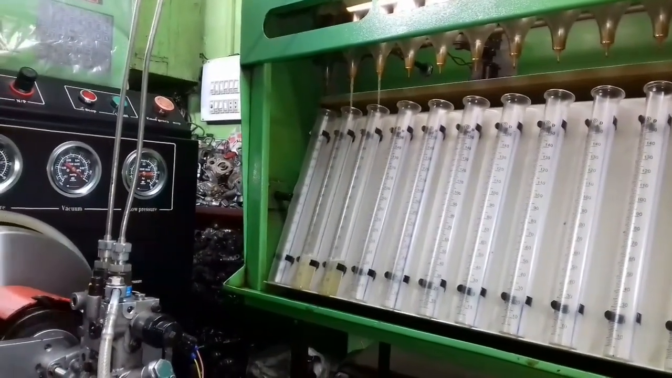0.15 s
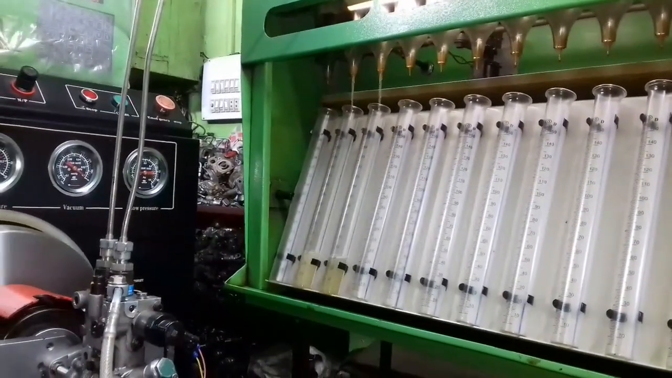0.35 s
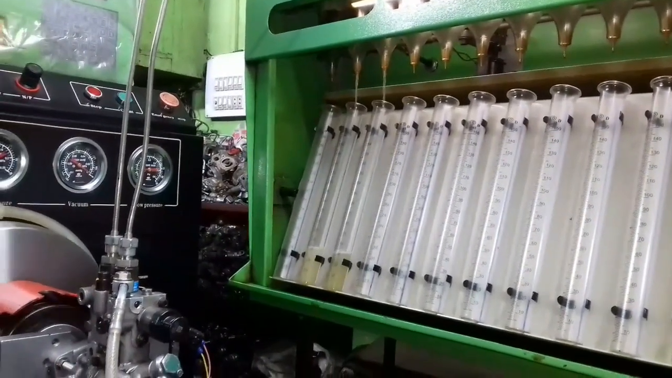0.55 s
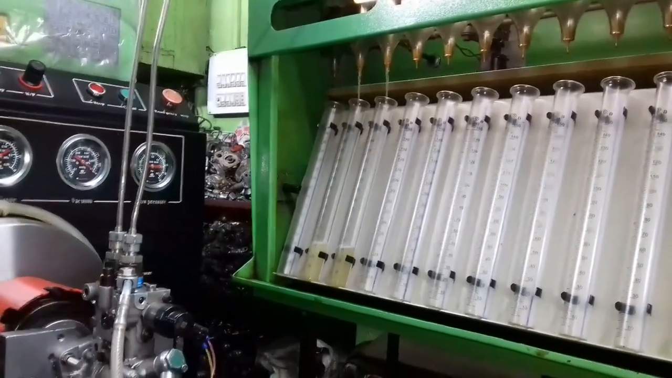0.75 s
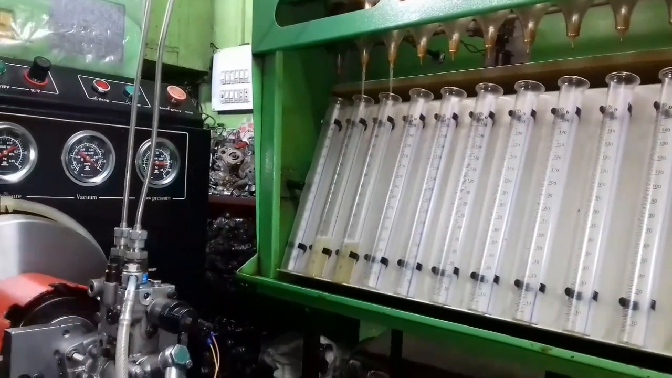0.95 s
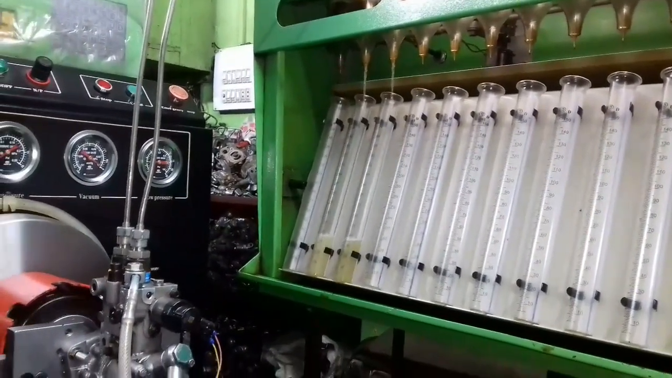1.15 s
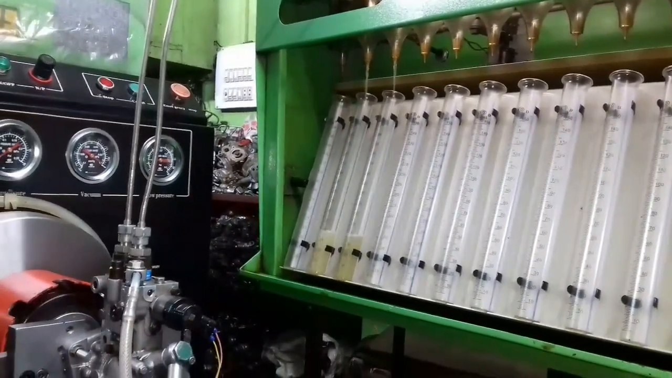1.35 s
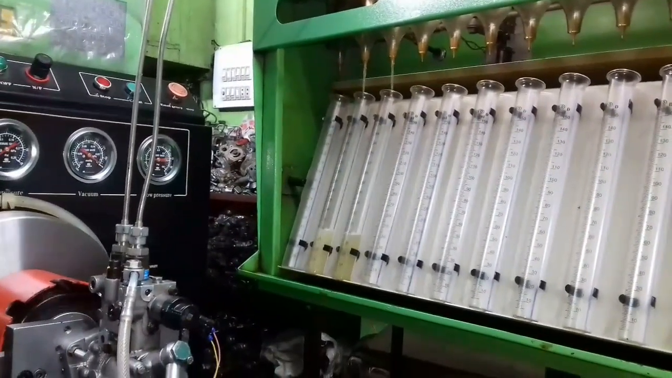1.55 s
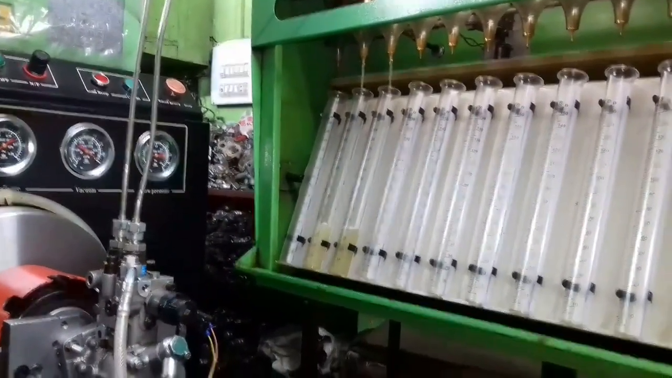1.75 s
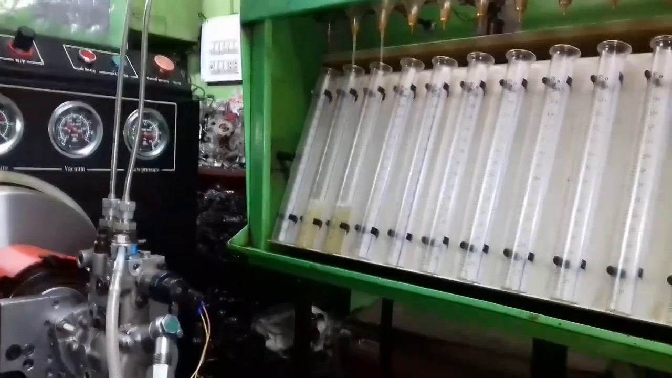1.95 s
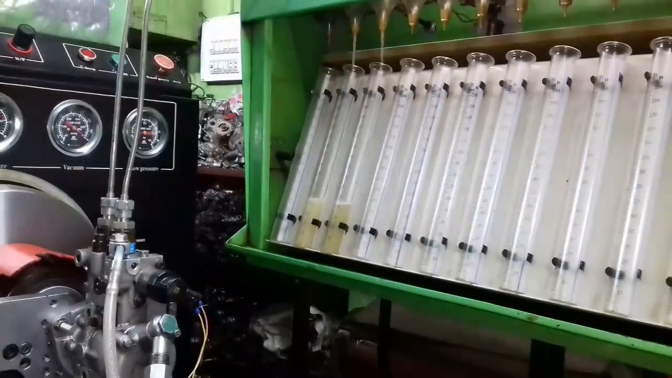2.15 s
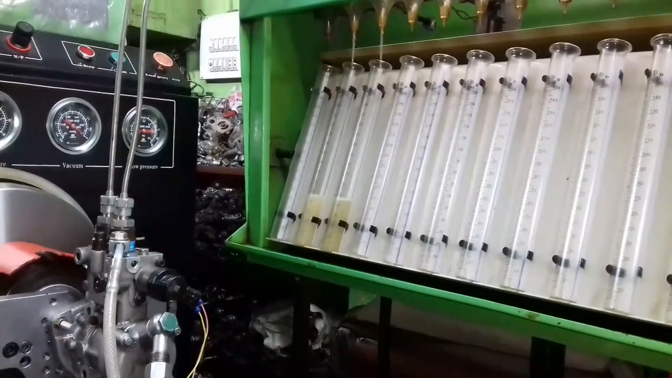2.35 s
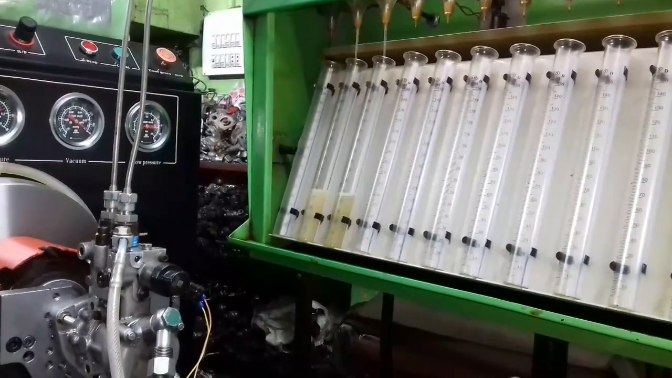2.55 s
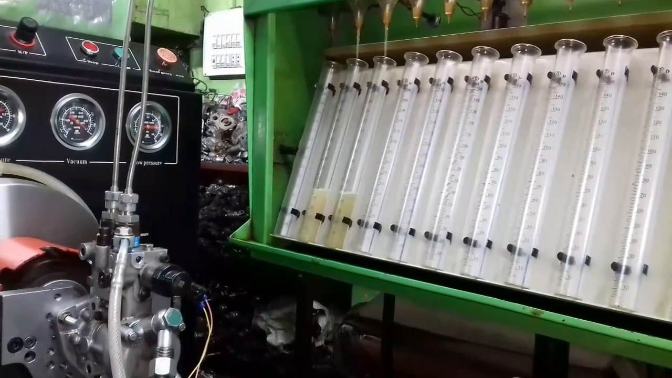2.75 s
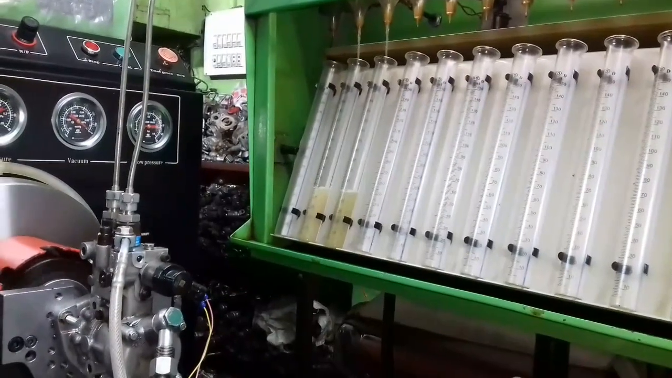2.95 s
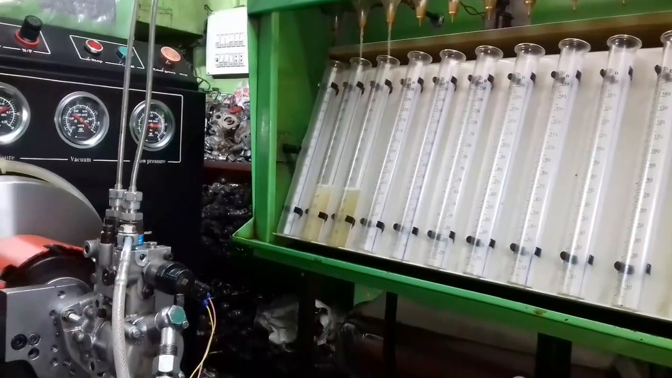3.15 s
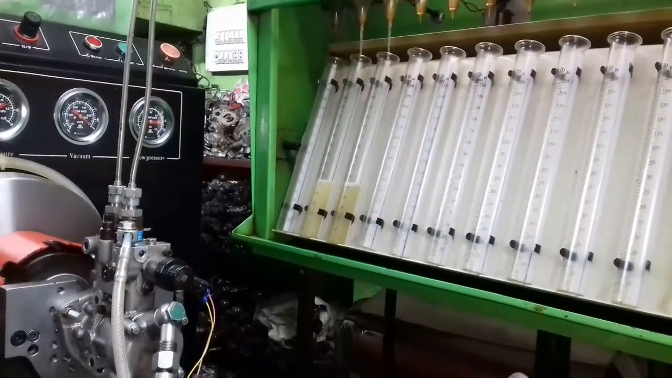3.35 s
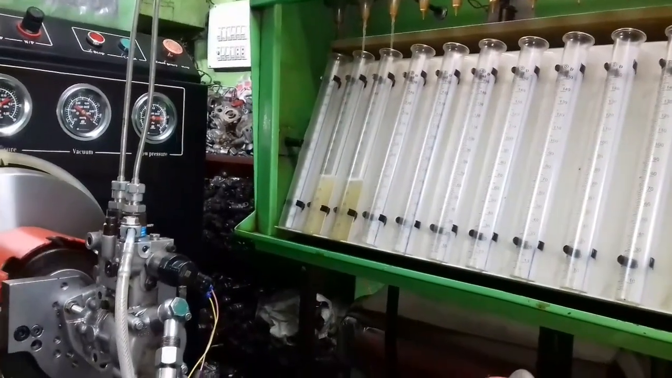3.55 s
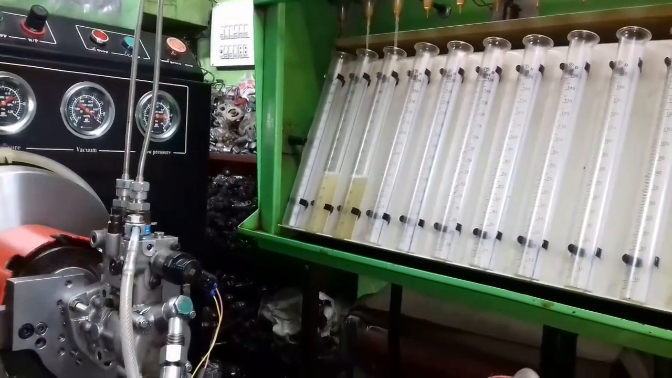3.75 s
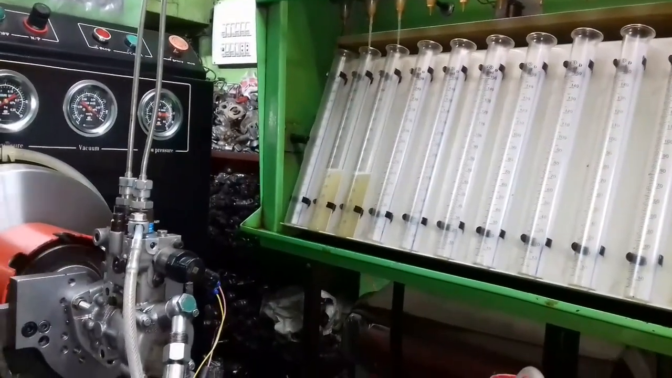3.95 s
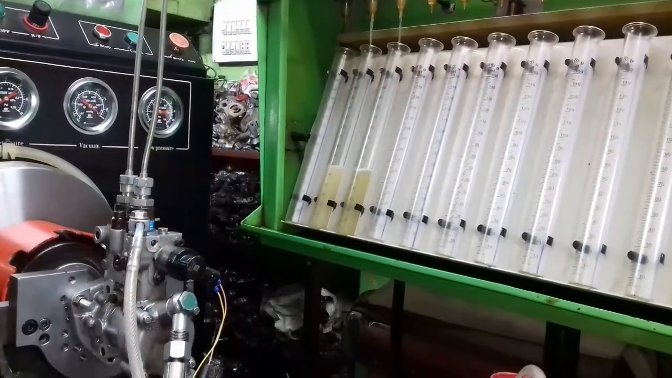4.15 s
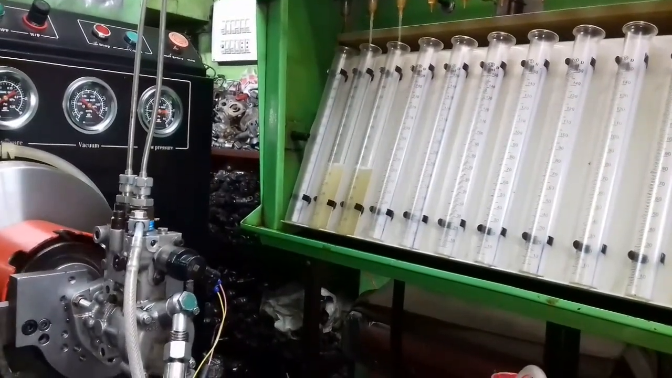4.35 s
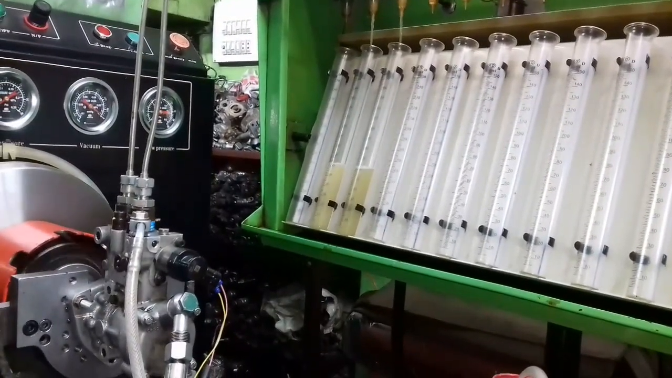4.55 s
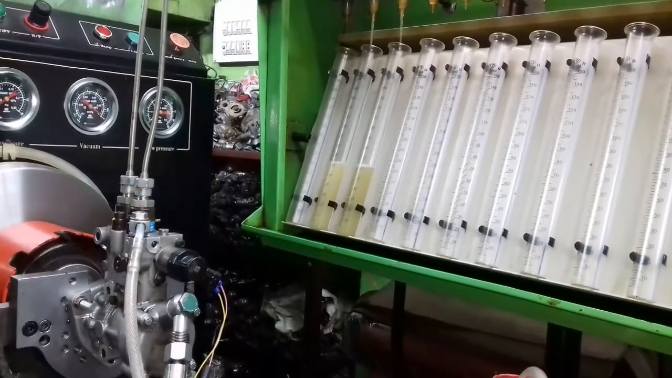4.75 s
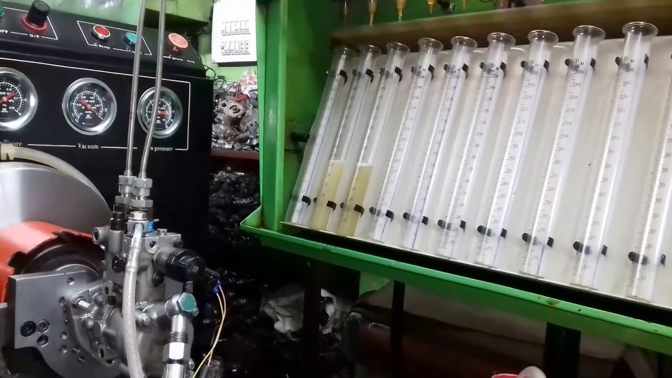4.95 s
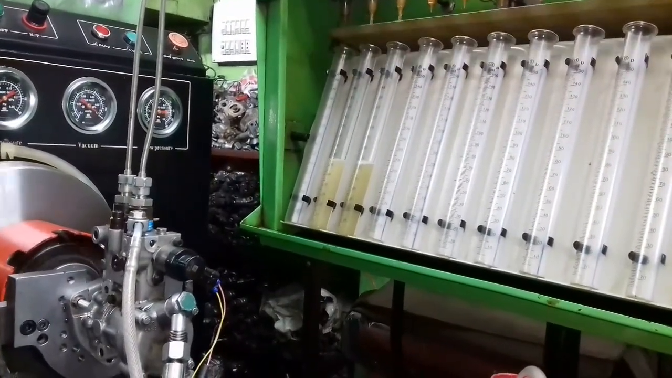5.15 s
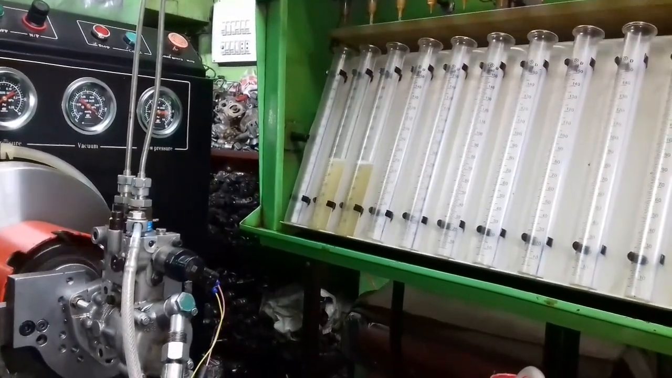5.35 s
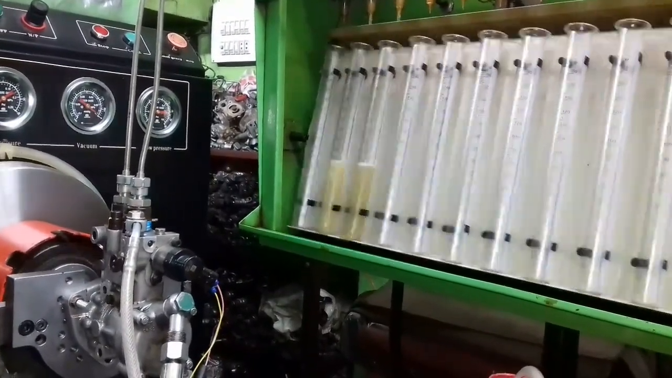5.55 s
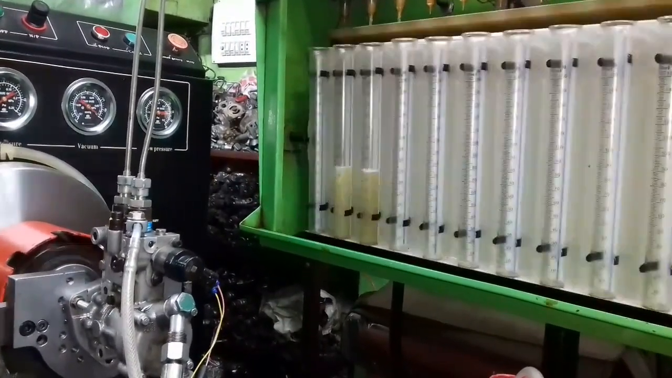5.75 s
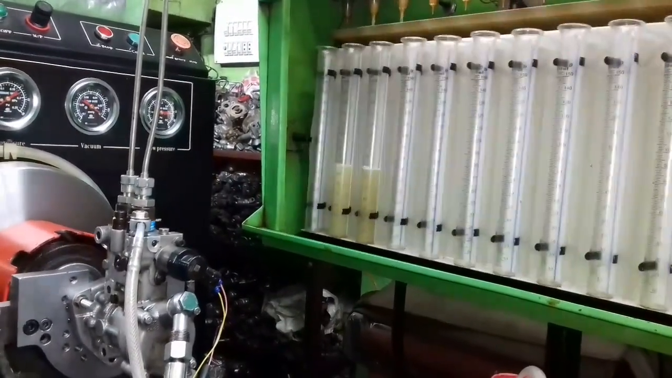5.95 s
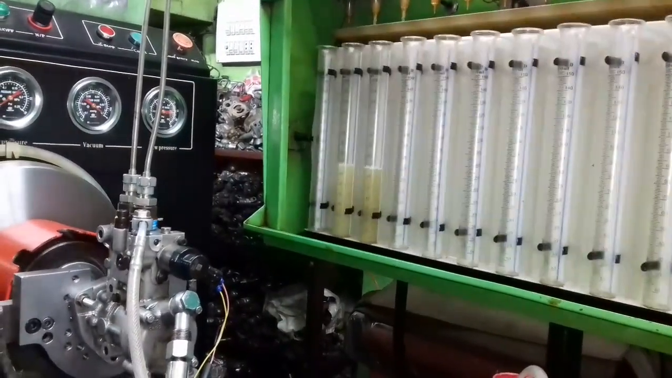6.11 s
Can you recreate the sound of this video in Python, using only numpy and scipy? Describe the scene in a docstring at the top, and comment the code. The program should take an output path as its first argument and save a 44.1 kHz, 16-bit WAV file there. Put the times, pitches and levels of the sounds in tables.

```python
"""A three-plunger fuel injection pump runs on a test bench in a small workshop.
Throughout, summed harmonics make drive, pump body and pipe throb; shaped noise makes the tappets rattle,
decaying modes make a nozzle chirp, and puffs of high hiss are fuel squirting into two measuring glasses.
At 4.7 s a closing shutter cuts off the jets and the load eases; at 4.9 s it slams in six blows of noise.
The limiter ducks and recovers very slowly; two small clicks of noise follow from the rack of glasses."""
import sys
import numpy as np
from scipy import signal
from scipy.fft import rfft, irfft
from scipy.io import wavfile
from scipy.ndimage import uniform_filter1d

SR = 44100
rng = np.random.default_rng(int(sys.argv[2]) if len(sys.argv) > 2 else 0)


def to_wav(sig):
    """Store sig (one row per channel, or 1-D mono) as 16-bit WAV at the path in sys.argv[1].

    Samples outside -1..1 are clipped; the rate is SR.
    """
    pcm = np.clip(np.atleast_2d(sig), -1, 1) * 32767
    pcm = np.round(pcm).astype(np.int16)
    wavfile.write(sys.argv[1], SR, pcm.T)  # frames by channels


N = 276948
TIME = np.arange(N) / SR

SHAFT_HZ, PLUNGERS = 10.1283, 3
STROKE_HZ = PLUNGERS * SHAFT_HZ
TURNS = SHAFT_HZ * TIME


def amp(db):
    """Decibels to gain."""
    return 10 ** (np.asarray(db) / 20)


def unit(x):
    """Scales to an rms of 1."""
    return x / np.sqrt(np.mean(x ** 2) + 1e-20)


def across(rows):
    """Interpolates rows (Hz, value) on a log axis, for every frequency bin."""
    hz, value = np.transpose(rows)
    bins_hz = np.fft.rfftfreq(N, 1 / SR)
    return np.interp(np.log(bins_hz + 1), np.log(hz), value)


def tint(x, gain):
    """Filters by one gain for each frequency bin."""
    return irfft(rfft(x) * gain, N)


def hiss(rows):
    """Noise of rms 1 with the given colour."""
    return unit(tint(rng.standard_normal(N), amp(across(rows))))


def drift(rate_hz):
    """Random wander of rms 1: straight lines between rate_hz random knots a second."""
    knots = rng.standard_normal(1024)
    return unit(np.interp(TIME * rate_hz, np.arange(len(knots)), knots))


def ring(x, hz, width_hz):
    """Resonance of rms 1 and given half-power width; a double pole makes the skirts steep."""
    pole = np.exp((-np.pi * width_hz * np.pi / 2 + 2j * np.pi * hz) / SR)
    return unit(signal.lfilter([1], np.poly([pole, pole]), x).real)


def add(mix, start_s, sound):
    """Mixes a sound in at start_s, trimmed to the ends of the mix."""
    start = round(start_s * SR)
    part = mix[max(start, 0):max(start + len(sound), 0)]
    part += sound[max(-start, 0):][:len(part)]


def blow(start_s, rise_s, t60_s):
    """Envelope of one impact: a quick linear rise under an exponential decay."""
    age_s = np.maximum(TIME - start_s, 0)
    return np.minimum(age_s / rise_s, 1) * amp(-60 * age_s / t60_s)


def eased(start_s=4.66, length_s=0.11):
    """Share of the load relieved: goes from 0 to 1 while the shutter closes."""
    return np.clip((TIME - start_s) / length_s, 0, 1)


# Diffuse reflection of the workshop. Each row: frequency in Hz, relative gain in dB.
ROOM_COLOUR = [(60, -4), (180, -12), (550, -10), (1650, -8), (4970, -21), (15000, -12)]


def workshop(x, t60_s=0.033, level_db=2, gap_s=0.004):
    """Side walls return a short diffuse tail, modelled by decaying noise after a gap."""
    t = np.arange(SR // 2) / SR
    tail = rng.standard_normal(len(t)) * amp(-60 * t / t60_s) * (t > gap_s)
    tail /= np.linalg.norm(tail)
    return signal.fftconvolve(tint(x, amp(level_db + across(ROOM_COLOUR))), tail)[:N]


# Gear case resonances. Each row: frequency in Hz, width between -6 dB points in Hz,
# rms level in dB of a stroke harmonic at the peak.
GEAR_CASE_MODES = [(255, 59, -47.5), (361.6, 10.6, -43), (475.4, 54, -40), (619, 97, -44.5),
                   (943, 164, -41.5), (1141, 30, -41), (1240, 23.6, -36.5), (1544, 190, -47),
                   (1689, 37, -39.5), (3994, 45, -46)]


def gears(turns, between_strokes_db=-17):
    """Gears buzz alike every turn: shaft harmonics coloured by the case; near-equal plungers favour every third."""
    k = np.arange(1, 440)
    power = 0
    for hz, width_hz, db in GEAR_CASE_MODES:
        detune = 2 * (k * SHAFT_HZ - hz) / width_hz
        power = power + (amp(db) / (1 + detune ** 2)) ** 2
    size = np.sqrt(power) * amp(between_strokes_db * (k % PLUNGERS > 0))
    count = 2 ** 15
    spectrum = np.r_[0, size * np.exp(2j * np.pi * rng.random(len(k)))]
    one_turn = irfft(spectrum, count) * count / np.sqrt(2)
    return np.interp(turns % 1 * count, np.arange(count), one_turn)


def throb(lines, cycles, crest, scatter_cycles, tilt_db=0, smear_rad=0):
    """Harmonics swell together at place crest; random phase loosens the swell, dispersion spreads it."""
    centre = np.mean([k for k, _ in lines])
    out = np.zeros(N)
    for k, db in lines:
        offset = k - centre
        phase = 2 * np.pi * (k * (cycles - crest) + scatter_cycles * rng.standard_normal())
        out += np.sqrt(2) * amp(db + tilt_db * offset) * np.cos(phase + smear_rad * offset ** 2)
    return out


# Shaft hum. Each row: multiple of the shaft rate, relative level in dB.
HUM_LINES = [(8, -60), (9, -60), (10, -58), (11, -47.5), (12, -43.5), (13, -49.5), (14, -59), (16, -54)]
# Drive, pump body and pipe. Each row: multiple of the stroke rate, relative level in dB.
DRONE_LINES = [(23, -53), (24, -36), (25, -34.5), (26, -31), (27, -33), (28, -31), (29, -39)]
WHINE_LINES = [(72, -42.5), (73, -39), (74, -32.5), (75, -36.5), (76, -31), (77, -50)]
PIPE_LINES = [(107, -42.5), (108, -36.5), (109, -42), (110, -44)]


def drive(ease_db=-2.5, tilt_db=0.36, eased_tilt_db=1):
    """The shaft hums each turn; strokes load drive, body and pipe, softer and brighter as the load eases."""
    turns = TURNS + 0.00025 * drift(rate_hz=9)  # slight unevenness of speed
    strokes = PLUNGERS * turns
    ease = eased()
    tilt = tilt_db + (eased_tilt_db - tilt_db) * ease  # dB per harmonic
    hum = throb(HUM_LINES, turns, crest=0.65, scatter_cycles=0.13)
    hum *= amp(1.9 * drift(rate_hz=10))
    drone = throb(DRONE_LINES, strokes, crest=0.19, scatter_cycles=0.03, tilt_db=tilt, smear_rad=-0.26)
    drone *= amp(0.5 * drift(rate_hz=25))
    whine = throb(WHINE_LINES, strokes, crest=0.99, scatter_cycles=0.025, tilt_db=tilt, smear_rad=-0.52)
    whine *= amp(1.0 * drift(rate_hz=19))
    pipe = throb(PIPE_LINES, strokes, crest=0.07, scatter_cycles=0.025)
    pipe *= amp(0.57 * drift(rate_hz=20))
    # start level in dB, then slope in dB/s
    drone *= amp(1.7 - 0.3 * TIME)
    whines = (whine + amp(0.5) * pipe) * amp(2.5 - 1.0 * TIME)
    return hum + gears(turns) + (drone + whines) * amp(ease_db * ease)


def jets(level_db=-43, place=0.61, length=0.1, hz=12300, width_hz=700):
    """Two of three plungers squirt a short high hiss each stroke; it fades out as the shutter closes."""
    count, within = np.divmod(PLUNGERS * TURNS, 1)
    puff = np.exp(-((within - place) / length) ** 2)  # place and length in strokes
    puff *= count % PLUNGERS < 2
    return amp(level_db) * (1 - eased()) * ring(puff * rng.standard_normal(N), hz, width_hz)


# Knocks within a stroke. Each row: place in the stroke (0-1), time constant of power decay in seconds,
# mean relative level in dB on plungers 1, 2 and 3.
KNOCK_ROWS = [(.0, 0.01, 1.5, 0.5, 1), (0.2, 0.0022, -1.5, -7.5, 2.5), (0.486, 0.0011, 3.5, 3.5, 9.5),
              (.735, 0.0012, 7.5, 10.5, -0.5), (0.838, 0.0063, 5.5, 3, 5)]


def knocking(steady_db=-9, uneven_db=1.38):
    """Strength of the metal contact: decaying knocks each stroke over a steady churn."""
    strokes = PLUNGERS * TURNS + PLUNGERS  # offset keeps the count positive
    power = np.full(N, amp(steady_db) ** 2)
    for place, decay_s, *plunger_db in KNOCK_ROWS:
        count, age = np.divmod(strokes - place, 1)
        count = count.astype(int)
        db = np.array(plunger_db)[count % PLUNGERS] + uneven_db * rng.standard_normal(256)[count]
        power += amp(db) ** 2 * np.exp(-age / (STROKE_HZ * decay_s))
    return np.sqrt(power)


# Rattle colour. Each row: frequency in Hz, relative density in dB per Hz.
RATTLE_COLOUR = [(30, -31), (75, -28), (130, -11), (330, -11.5), (480, -6), (900, -7), (1950, -7),
                 (2700, -6.5), (2900, -16), (3600, -7.5), (4750, -11.5), (6500, -1), (9600, -8.5),
                 (11200, -16.5), (15000, -23)]
# Grain that repeats every turn. Each row: frequency in Hz, share of power (0-1).
REPEAT_SHARE = [(200, 0.39), (2500, 0.79), (5000, 0.46), (9000, 0.16)]
# Pump, pipe and frame resonances. Each row: frequency in Hz, half-power width in Hz, rms level in dB.
CASTING_MODES = [(829, 117, -37.5), (1198, 58, -39.5), (2295, 134, -33.5), (3334, 140, -38),
                 (4043, 124, -35.5), (5336, 120, -36.5), (5777, 75, -33.5), (5913, 27, -32.5),
                 (6326, 130, -29.5), (6825, 95, -28), (8290, 190, -30), (8900, 17, -31), (8980, 25, -30),
                 (9820, 110, -32.5), (10620, 130, -40.5), (12340, 120, -48)]


def tappets(rattle_db=-22, sing_db=-33, swell_db=10, swell_s=3.15, swell_width_s=0.41):
    """Knocks excite casting and pipework; the same surfaces meet each turn, so part of the grain repeats."""
    force = knocking()
    surface = rng.standard_normal(round(SR / SHAFT_HZ))
    position = (TURNS % 1 * len(surface)).astype(int)
    same = np.sqrt(force) * surface[position]  # the heavy parts follow the knocks less
    fresh = force * rng.standard_normal(N)
    share = np.clip(across(REPEAT_SHARE), 0, 1)
    contact = tint(same, np.sqrt(share)) + tint(fresh, np.sqrt(1 - share))
    rattle = amp(rattle_db) * unit(tint(contact, amp(across(RATTLE_COLOUR))))
    casting = np.zeros(N)
    for hz, width_hz, db in CASTING_MODES:
        casting += amp(db) * ring(force * rng.standard_normal(N), hz, width_hz)
    # thin ring in the pipework, with one swell
    swell = np.exp(-((TIME - swell_s) / swell_width_s) ** 2)
    sing = amp(sing_db + swell_db * swell) * ring(force * rng.standard_normal(N), hz=7027, width_hz=30)
    return rattle + casting + sing


# Chattering nozzle modes. Each row: frequency in Hz, relative level in dB, t60 in seconds.
NOZZLE_MODES = [(8190, -15, .07), (8855, -7, .06), (8920, -5, .08), (9065, 0, .05), (9120, -10, .025),
                (15000, -19, .018)]


def nozzle(level_db=-13.5, waver_db=1.17, place=0.875, rise_s=0.0028, uneven_db=1.45,
           shift_cycles=0.067, loose_cycles=0.22):
    """The needle chatters briefly once a stroke; its close modes beat as they die."""
    t = np.arange(-SR // 100, SR // 10) / SR
    hz, db, t60_s = np.transpose(NOZZLE_MODES)[:, :, None]
    decay = amp(db - 60 * np.maximum(t, 0) / t60_s)
    rise = -(np.minimum(t, 0) / rise_s) ** 2
    modes = decay * np.exp(rise + 2j * np.pi * hz * t)
    out = np.zeros(N)
    for stroke in range(int(PLUNGERS * TURNS[-1]) + 1):
        size, shift, *slips = rng.standard_normal(2 + len(NOZZLE_MODES))
        phases = np.exp(2j * np.pi * (shift_cycles * shift + loose_cycles * np.array(slips)))
        chirp = amp(uneven_db * size) * (phases @ modes).real
        add(out, (stroke + place) / STROKE_HZ + t[0], chirp)
    return out * amp(level_db + waver_db * drift(rate_hz=3.7))


# Clicks of the glass rack. Each row: start in seconds, level in dB, t60 in seconds.
RACK_CLICKS = [(5.753, -14, 0.078), (6.111, -27, 0.046)]
# Click colour. Each row: frequency in Hz, relative density in dB per Hz.
CLICK_COLOUR = [(3000, -21), (8500, -7), (10000, 3), (12300, 1.5), (13300, -16), (15500, -24)]


def rack(rise_s=0.0014):
    """Swinging the rack of glasses upright gives thin, bright clicks of decaying noise."""
    envelope = sum(amp(db) * blow(start_s, rise_s, t60_s) for start_s, db, t60_s in RACK_CLICKS)
    return hiss(CLICK_COLOUR) * envelope


# Shutter blows. Each row: start in seconds, rise in seconds, t60 in seconds,
# steel jangle level in dB, panel clatter level in dB.
SHUTTER_BLOWS = [(4.924, 0.016, 0.39, -10, -19), (4.948, 0.014, 0.29, -2, -1), (4.986, 0.013, 0.34, -5, -7),
                 (5.022, 0.014, 0.46, -4.5, -31), (5.087, 0.018, 0.28, -3.5, -12.5),
                 (5.12, 0.022, 0.27, -5, -38)]
# Steel and panel colours. Each row: frequency in Hz, relative density in dB per Hz.
JANGLE_COLOUR = [(200, -49), (3500, -16.5), (5200, -6.5), (7000, -1), (8100, -3), (9200, 0), (10500, -12),
                 (13000, -24), (15500, -28)]
CLATTER_COLOUR = [(30, -22), (80, -3), (180, 1.5), (500, 2.5), (1200, 0.5), (1900, 2), (3000, 1.5),
                  (7000, -9), (11000, -2.5), (15500, -7.5)]


def shutter(grain_db=-1.0, boom_db=-25, boom_t60_s=0.75):
    """The steel shutter scrapes, slams and rebounds, shaking the panels; the cabinet booms on a little."""
    steel_power, panel_power = np.zeros(N), np.zeros(N)
    for start_s, rise_s, t60_s, steel_db, panel_db in SHUTTER_BLOWS:
        envelope = blow(start_s, rise_s, t60_s)
        steel_power += (amp(steel_db) * envelope) ** 2
        panel_power += (amp(panel_db) * envelope) ** 2
    jangle = np.sqrt(steel_power) * hiss(JANGLE_COLOUR)
    clatter = np.sqrt(panel_power) * hiss(CLATTER_COLOUR)
    grain = amp(grain_db * drift(rate_hz=150))
    cabinet = ring(rng.standard_normal(N), hz=370, width_hz=97)
    boom = amp(boom_db) * blow(4.955, 0.022, boom_t60_s) * cabinet
    return (jangle + clatter) * grain + boom


def scene():
    """All sources are central; the slam's wall return has opposite sign at the two microphones."""
    slam = shutter()
    central = drive() + tappets() + nozzle() + jets() + rack() + slam
    return central + np.outer([1, -1], workshop(slam))


def microphones(pair, dip_hz=8000, width_hz=1050, reach_hz=2000, dip_db=-7.2):
    """A treble dip in the left-to-right ratio, in level and phase, split evenly between the two."""
    offset_hz = np.fft.rfftfreq(N, 1 / SR) - dip_hz
    dip = np.exp(-(offset_hz / reach_hz) ** 4) / (1 + 2j * offset_hz / width_hz)
    left_over_right = 1 - (1 - amp(dip_db)) * dip
    return tint(pair, left_over_right ** np.array([[0.5], [-0.5]]))


def record(dry, limit_db=-11.0, recovery_db_per_s=0.5, edge_hz=15750):
    """Microphone pair, limiter on the 29 ms mean power with instant duck and slow recovery, band limit."""
    heard = microphones(dry)
    power = uniform_filter1d((heard ** 2).mean(0), size=1300)
    power_db = 10 * np.log10(abs(power) + 1e-12)
    fall_db = recovery_db_per_s * TIME
    held_db = np.maximum.accumulate(power_db + fall_db) - fall_db
    over_db = np.maximum(held_db - limit_db, 0)
    low_pass = signal.firwin(401, edge_hz, window=("kaiser", 9), fs=SR)
    return signal.oaconvolve(heard * amp(-over_db), low_pass[None], "same", axes=1)


dry = scene()
out = record(dry)
to_wav(out)
```